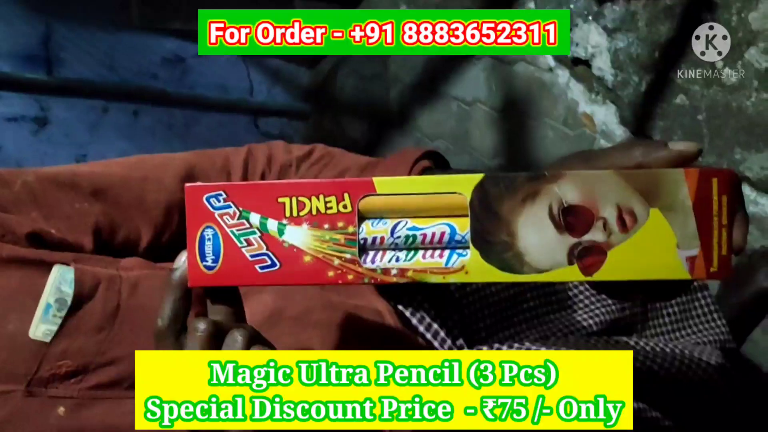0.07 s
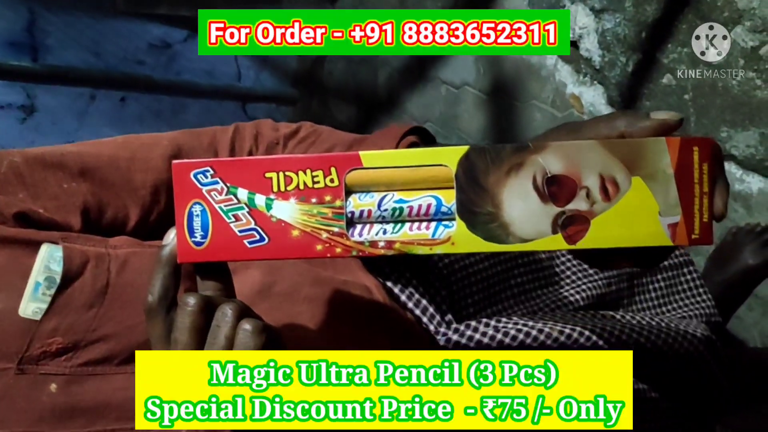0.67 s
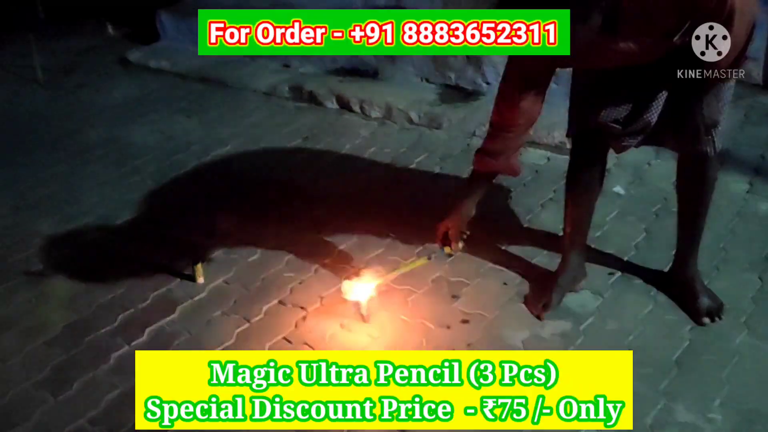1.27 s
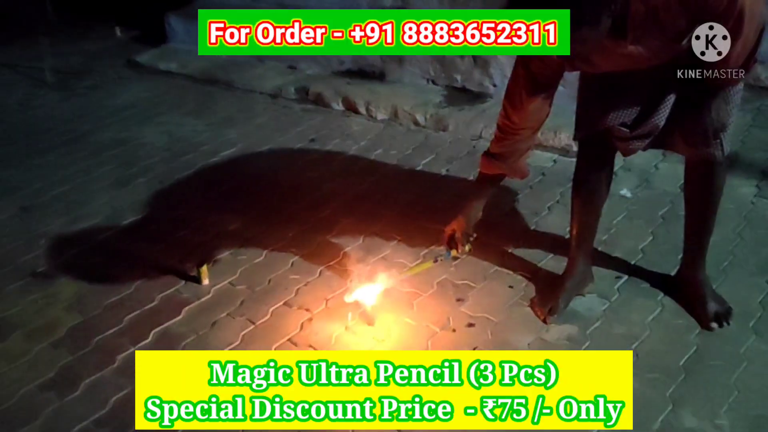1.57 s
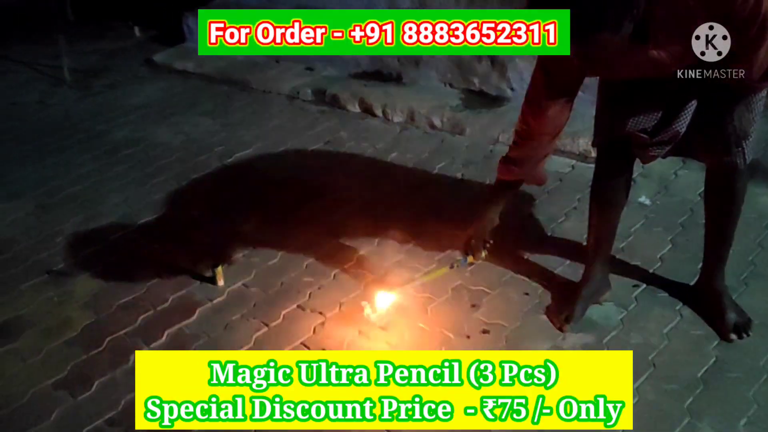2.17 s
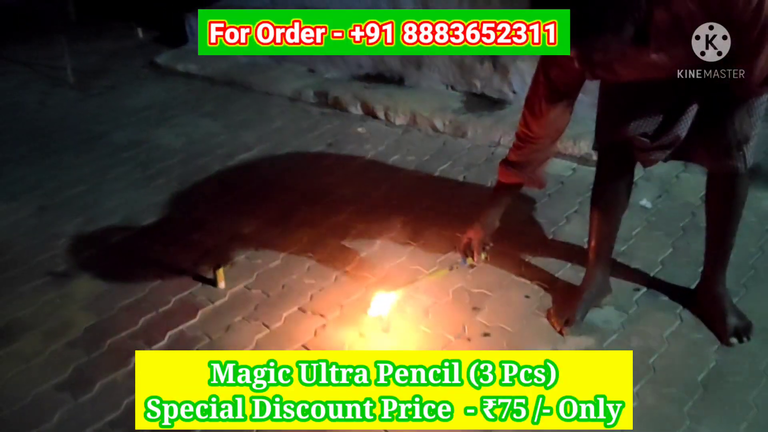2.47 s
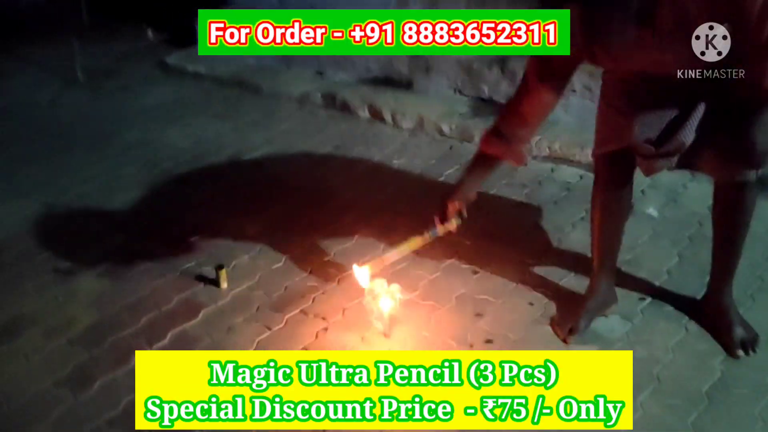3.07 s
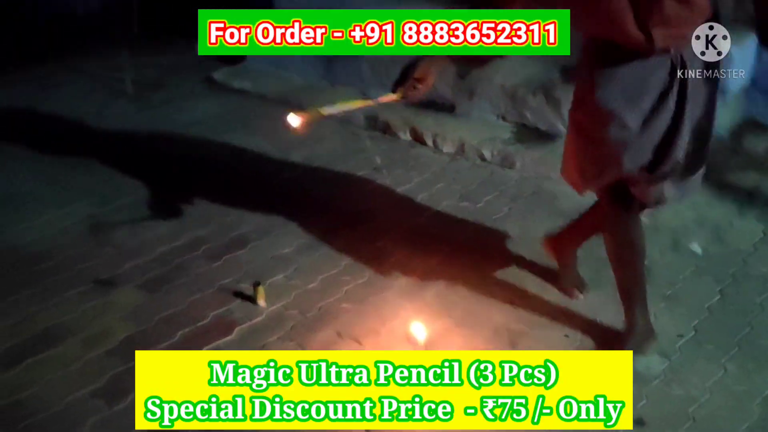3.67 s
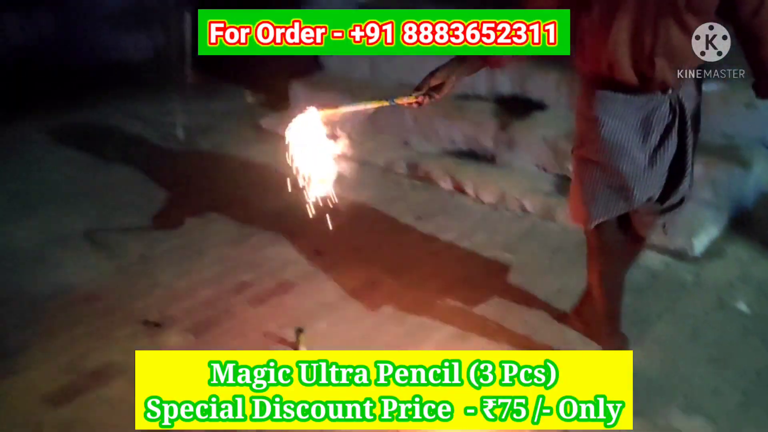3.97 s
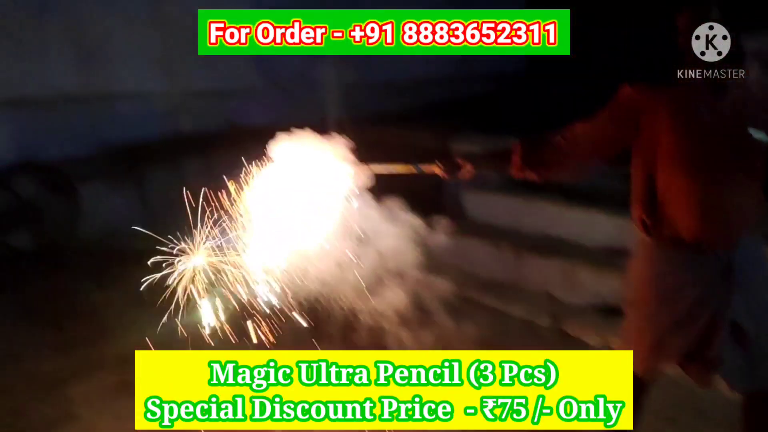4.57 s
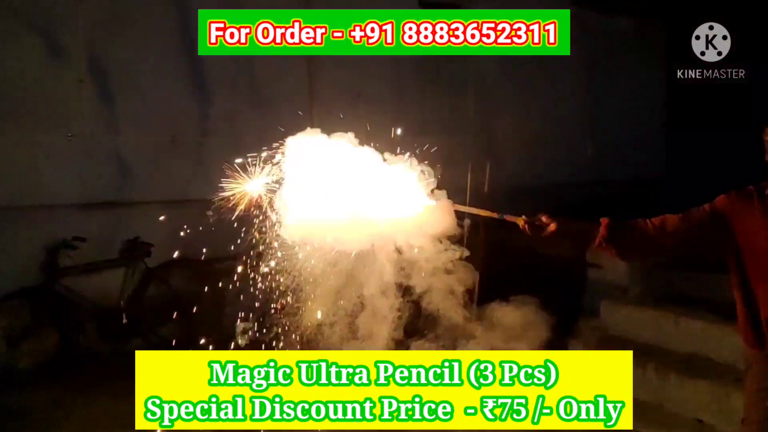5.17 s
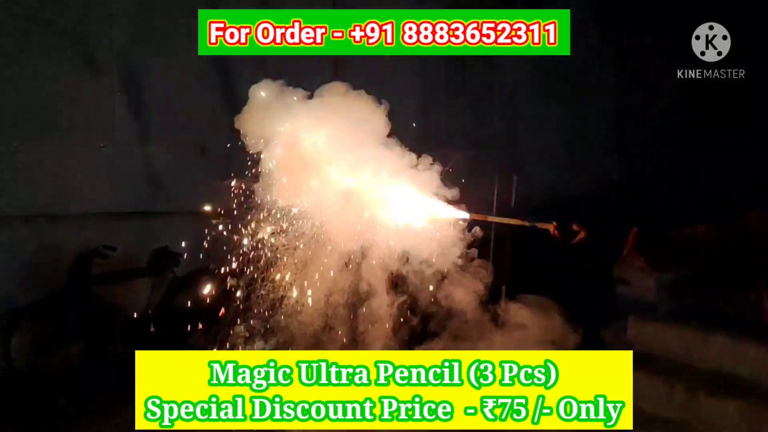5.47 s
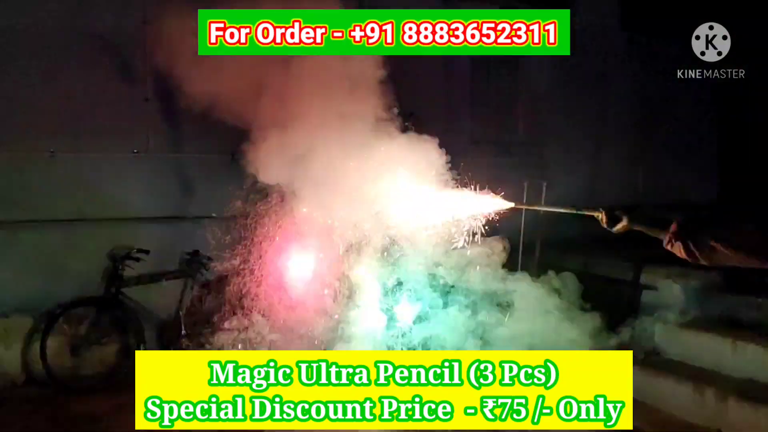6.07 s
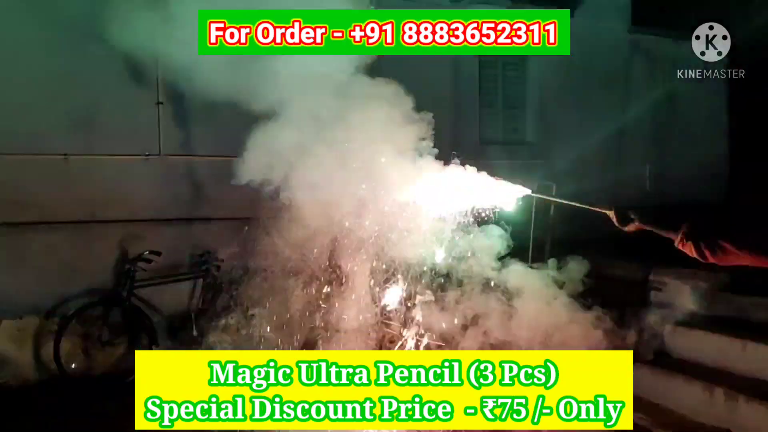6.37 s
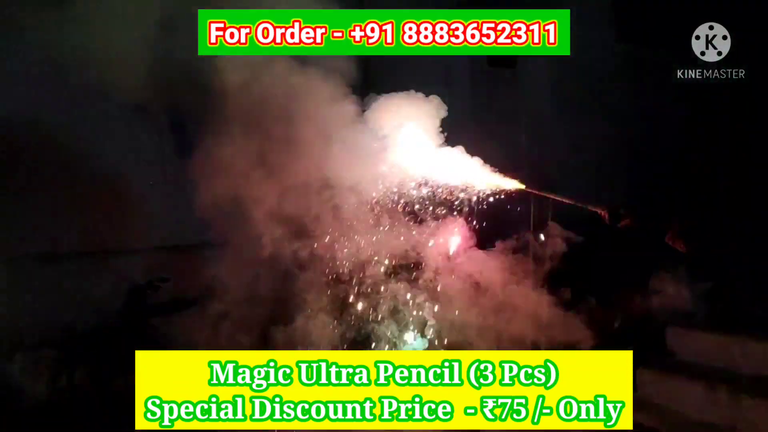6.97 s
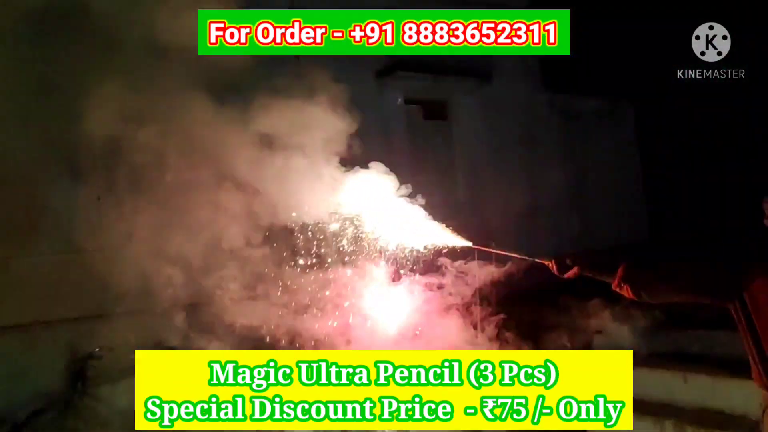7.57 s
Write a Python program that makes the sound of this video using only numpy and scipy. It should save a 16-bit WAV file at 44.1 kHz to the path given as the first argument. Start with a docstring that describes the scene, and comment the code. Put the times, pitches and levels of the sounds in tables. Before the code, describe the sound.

In a paved yard at night, crickets trill and bush crickets give high, rasping chirps over a faint rumble. The tip of a handheld firework sputters softly in a flame, and fingers tap and rub near the microphone. About halfway a jet of gas starts hissing, then loud, uneven cracks and dull thumps follow, each trailing sizzling sparks. The blasts echo briefly off walls and overload the microphone.

```python
"""A handheld pencil firework shoots stars that burst in uneven cracks and thumps, in a paved yard at night.
Each burst leaves a sizzle of sparks between the walls. Before that, the tip sputters in a flame, fingers
shift on the phone, and a jet of gas starts to hiss. The blasts overload the microphone; each channel's
signal lurches, swings slowly back and chokes the hiss. Behind it all, crickets and bush crickets call."""
import sys
import numpy as np
from scipy import signal
from scipy.fft import rfft, irfft, next_fast_len
from scipy.io import wavfile

SR = 44100
rng = np.random.default_rng(int(sys.argv[2]) if len(sys.argv) > 2 else 0)


def digitize_waveform(pressure):
    """Quantize a signal to 16-bit integers and store it at the path in sys.argv[1].

    Rows of a 2-D input are taken as channels; values are limited to [-1, 1].
    """
    field = np.atleast_2d(pressure).T
    bounded = np.clip(field, -1, 1)
    quanta = np.round(bounded * 32767).astype(np.int16)
    wavfile.write(sys.argv[1], SR, quanta)


N = 344421
T = np.arange(N) / SR


# How strong a crack is from low to high pitch: f/Hz, level/dB
CRACK_TONE = [(100, -49), (500, -8.5), (1000, -3.5), (1600, -7), (2500, 5), (3600, 0), (5500, 2),
              (7800, 7.5), (11000, 2), (14000, -3.5)]
# Bursting stars; each layer adds its own gain: t/s, crack level/dB, thump level/dB, sizzle level/dB
BURSTS = [(4.6916, -12.5, -70, -24.5), (4.7852, -20.5, -75, -50), (4.873, -12.5, -20.5, -21),
          (4.886, -10.5, -23, -22), (5.0562, -11, -21.5, -24.5), (5.1755, -21, -39, -51),
          (5.2172, -23, -55, -32.5), (5.2361, -9.5, -14.5, -18), (5.2453, -8, -21, -18),
          (5.279, -12, -27, -41), (5.3557, -13.5, -26, -43), (5.4718, -12.5, -11.5, -23.5),
          (5.5234, -15, -20.5, -32), (5.7526, -13, -20.5, -22.5), (5.771, -22.5, -25.5, -34),
          (5.8548, -12.5, -27, -26), (5.919, -11, -32.5, -26), (5.9697, -15, -30.5, -25),
          (6.153, -11.5, -19, -16), (6.1725, -16.5, -23.5, -29), (6.1933, -14.5, -27, -43),
          (6.225, -9, -23, -20), (6.4725, -18, -36, -37), (6.499, -14.5, -21.5, -24),
          (6.56, -18.5, -30.5, -49), (6.696, -25.5, -46, -36), (6.876, -19, -31, -29.5),
          (7.0063, -16, -29.5, -25.5), (7.0389, -6.5, -14.5, -18), (7.1998, -17, -36.5, -48),
          (7.226, -14, -32.5, -23.5), (7.235, -16, -22, -20.5), (7.44, -12.5, -25.5, -20),
          (7.4692, -14, -32.5, -25), (7.4999, -11, -21, -20.5), (7.51, -8, -17.5, -19.5),
          (7.7773, -21, -33, -27)]
def cracks(snap_s=0.0017, paving_db=-2, repeat_db=-9.5, wall_db=-12, gain_db=7, tint_db=2.0):
    """A star snaps, each with its own tone; the paving and then the walls throw the snap back."""
    out, t = np.zeros((2, N)), T[:SR // 16]
    noise = stereo_noise(CRACK_TONE, shared_hz=1520)
    tint_hz = np.geomspace(400, 12000, 8)
    for (s, db, _, _), chance in zip(BURSTS, rng.random((len(BURSTS), 13))):
        snap = (undb(db + gain_db) * np.exp(-t / snap_s)) ** 2
        power = np.zeros(2 * len(t))
        add(power, 0, snap)
        add(power, .0018 + 0.0024 * chance[0], snap * undb(paving_db) ** 2)
        # every crack repeats, weaker, about 18 ms later
        add(power, 0.018 + 0.004 * (chance[1] - .5), snap * undb(repeat_db) ** 2)
        for wall in chance[2:5]:
            add(power, 0.0044 + 0.028 * wall, snap * undb(wall_db) ** 2)
        tint = np.column_stack([tint_hz, tint_db * (2 * chance[5:] - 1)])
        grain = noise[:, int(s * SR) - len(power):int(s * SR)]
        add(out, s, np.sqrt(power) * shape_tone(grain, tint))
    return out


# The dull tone of a thump: f/Hz, level/dB
THUMP_TONE = [(50, -28), (180, 7), (320, -1), (550, 2), (850, -2.5), (1400, -5.5), (2200, -8.5),
              (5000, -22)]
def thumps(gain_db=35, echo_db=-4, spread_s=0.00597):
    """A star's puff of gas gives the air a blunt push, which bounces off paving and body."""
    pulses = np.zeros((2, N))
    for (s, _, db, _), chance in zip(BURSTS, rng.random((len(BURSTS), 8))):
        pulses[:, int((s + .0005) * SR)] += undb(db + gain_db)
        for side, echoes in zip(pulses, chance.reshape(2, -1)):
            at = ((s + 0.001003 + spread_s * echoes) * SR).astype(int)
            side[at] += undb(db + gain_db + echo_db) * (-1) ** np.arange(len(at))
    return shape_tone(pulses, THUMP_TONE)


# The bright tone of the sparks: f/Hz, level/dB
SIZZLE_TONE = [(100, -4), (500, -14), (900, -10), (1500, -10), (2400, 0), (3500, -3.5), (5000, -1.5),
               (7500, 0.5), (10000, -0.5), (14000, -13.5)]
def sizzle(fast_s=0.035, slow_s=0.07, slow_share=0.35, gain_db=1, ticks_per_s=70, tick_db=-12):
    """After each burst, tiny sparks crackle out in spurts and melt into the echo of the yard."""
    fast, slow, t = np.zeros(N), np.zeros(N), T[:SR]
    for s, _, _, db in BURSTS:
        rise = undb(db + gain_db) ** 2 * (1 - np.exp(-t / 0.002))
        add(fast, s, rise * np.exp(-t / fast_s))
        add(slow, s, rise * np.exp(-t / slow_s))
    sparks = unit(undb(-wander(1000) - 0.5 * wander(190) + 0.7 * wander(40)))
    # now and then a larger spark ticks on its own
    big_sparks = (rng.random(N) < ticks_per_s / SR) * rng.random(N)
    tick_fade = np.exp(-1 / (0.00019 * SR))
    ticks = undb(tick_db) * unit(signal.lfilter([1], [1, -tick_fade], big_sparks))
    early = (1 - slow_share) * fast * sparks ** 2
    late = slow * (slow_share * sparks + ticks ** 2)  # echoes overlap, so this is less grainy
    return np.sqrt(early + late) * stereo_noise(SIZZLE_TONE, shared_hz=300)


# The tone of the hissing gas: f/Hz, level/dB
JET_TONE = [(150, -7.5), (330, -6.5), (1400, -14.5), (2500, -2), (4000, -9.5), (6000, -4.5), (8300, 4),
            (11000, -2.5), (14000, -5)]
def gas_jet(full_burn_s=4.347, catch_db_per_s=33, fade_db_per_s=0.7, hiss_db=-37.5, flame_db=-54.5):
    """Gas hisses from the tube over the soft rush of the flame; it catches fast, then slowly weakens."""
    grains = unit(undb(.5 * wander(45) + 2.0 * wander(1700)))
    hiss = undb(hiss_db) * grains * stereo_noise(JET_TONE, shared_hz=1800)
    rush = stereo_noise([(120, -10), (200, -7), (310, 2.5), (450, -12), (700, 0.5), (1050, -7.5),
                         (1500, -6.5), (4000, -20.5)], shared_hz=3000)
    age = T - full_burn_s
    surges_db = 2.5 * wander(5)
    burn = undb(np.minimum(catch_db_per_s * age, -fade_db_per_s * age) + surges_db)
    flare = swell(peak_s=4.24, db=-57, half_s=0.055)  # the flame flares as it catches
    return burn * (hiss + undb(flame_db) * rush) + flare * rush


# How the microphone's two ports (sound holes) differ: f/Hz, left minus right level/dB
PORT_BALANCE = [(300, 2.5), (2400, 0), (4400, -0.5), (7800, -7), (9500, -2.5), (12000, 11), (14500, 9.5)]
def port_tone(sound):
    """Each microphone port changes the tone of the firework in its own way, mostly the highs."""
    return np.array([shape_tone(side, [(hz, sign * db / 2) for hz, db in PORT_BALANCE])
                     for side, sign in zip(sound, (1, -1))])


def overload_swing(swing_hz=4.2, rise_s=0.0013, settle_s=0.184, right_share=0.55):
    """A blast overloads the microphone's amplifier; each channel's signal lurches and swings back."""
    out, t = np.zeros((2, N)), T[:SR]
    fade = (1 - np.exp(-t / rise_s)) * np.exp(-t / settle_s)
    for (s, _, thump_db, _), (force, pace) in zip(BURSTS, rng.uniform(-1.06, 1, (len(BURSTS), 2, 2, 1))):
        jolt = np.interp(thump_db, [-39, -21], [0, 0.87])  # weak thumps do nothing, big ones hit a limit
        direction = 1 if out[:, int(s * SR)].sum() < 0 else -1
        shares = np.array([[1], [right_share]]) + 0.7 * force
        swing = np.cos(2 * np.pi * swing_hz * (1 + 0.31 * pace) * t)
        add(out, s, direction * jolt * shares * fade * swing)
    wobble = stereo_noise([(25, 3.0), (60, -11.5), (150, -26.5), (400, -59), (3000, -90)], shared_hz=14)
    return out * (1 + 0.12 * wobble)


# Soft puffs from the tip, and a brief swish near 2.8 s: loudest t/s, level/dB, half length/s
TIP_PUFFS = [(1.28, -52, 0.034), (2.455, -51.5, 0.045), (2.8, -51.5, 0.013), (2.998, -53, 0.16)]
# Sharper spits, and a tick near 2.8 s: t/s, level/dB, fade time/s
TIP_SPITS = [(1.282, -41.5, .009), (1.312, -39.5, 0.0095), (2.814, -47, .005)]
def sputter(grain_db=3.5):
    """Held in the flame, the tip gives short gritty hisses and spits before the powder catches; near 2.8 s a
    brief swish and tick join in."""
    level, t = sum(swell(*puff) for puff in TIP_PUFFS), T[:SR // 8]
    for s, db, fade_s in TIP_SPITS:
        add(level, s, undb(db) * np.exp(-t / fade_s))
    hiss = stereo_noise([(300, -7), (900, 2.5), (1800, 2), (3000, -0.5), (5000, 1.0), (9000, 0),
                         (14000, -2)], shared_hz=1500)
    return level * unit(undb(grain_db * wander(1200))) * hiss


# Finger taps: t/s, level/dB
FINGER_TAPS = [(3.264, -49), (3.313, -41.5), (3.357, -37), (3.366, -40), (3.393, -39), (3.412, -42.5),
               (3.428, -44), (3.469, -42), (3.498, -50)]
# Skin sliding on the case: loudest t/s, level/dB, half length/s
FINGER_RUBS = [(3.303, -62, 0.22), (3.528, -48.5, 0.024), (3.631, -47.5, 0.048)]
# The tone of the phone case: f/Hz, level/dB
CASE_TONE = [(40, 5), (130, 6), (300, -5), (700, -4.5), (1300, -0.5), (2000, -3.5), (4000, -13),
             (7000, -16), (14000, -23)]
def fingers(tap_fade_s=0.0051, grit_db=2.5):
    """Fingers tap and drag on the phone case, mostly beside the left port."""
    taps, t = np.zeros((2, N)), T[:SR // 8]
    for s, db in FINGER_TAPS:
        add(taps, s, undb(db) * pan(left_db=16.5) * np.exp(-t / tap_fade_s))
    grit = unit(undb(grit_db * wander(1100)))
    drag = sum(swell(*rub) for rub in FINGER_RUBS) * pan(left_db=12) * grit
    return (taps + drag) * stereo_noise(CASE_TONE, shared_hz=300)


# Bush cricket chirps: loudest t/s, level/dB, left minus right level/dB
BUSH_CHIRPS = [(0.273, -38.5, -3), (0.723, -42, -2), (1.296, -48.5, -2), (1.406, -43.5, -1),
               (1.96, -33.5, -1), (2.426, -42, -5), (2.979, -32.5, 4), (3.523, -54, 1), (4.097, -31.5, -1)]
# The three beats of a chirp: t/s from the loudest, level/dB next to the loudest
CHIRP_BEATS = [(-0.11, -26), (0, 0), (0.113, -15)]
def bush_crickets(half_s=0.03, teeth_per_s=800):
    """Tiny teeth scrape across a wing and make it ring in a high, swelling rasp."""
    level = sum(pan(left_db) * swell(s + lag_s, db + beat_db, half_s)
                for s, db, left_db in BUSH_CHIRPS for lag_s, beat_db in CHIRP_BEATS)
    wing = stereo_noise([(5000, -60), (6700, -20.5), (7800, -5.0), (9200, -0.5), (10400, -3.5),
                         (11600, -10.5), (14000, -22)], shared_hz=3000)
    teeth = unit(undb(wander(teeth_per_s)))
    return yard_echo(level * wing * teeth)


def yard_echo(sound, ring_s=0.43, echo_db=-12.0):
    """Walls and paving add a blur of echoes that dies away by 60 dB in ring_s."""
    t = T[:SR]
    tail = rng.standard_normal((2, SR)) * undb(-60 * t / ring_s) * (t > .008)
    tail /= np.sqrt(np.sum(tail ** 2, axis=1, keepdims=True))
    return sound + undb(echo_db) * signal.fftconvolve(sound, tail, axes=1)[:, :N]


# The tone of the distant rumble: f/Hz, level/dB
RUMBLE_TONE = [(25, 0.5), (90, 1.5), (150, -12.5), (380, -8.5), (600, -13), (1100, -20), (1600, -22),
               (2200, -17.5), (3300, -31), (5000, -31.5), (8000, -18), (14000, -40)]
# Steady night callers: f/Hz, width/Hz, level/dB, start t/s, pulse rate/Hz, pulse depth (0 = no pulsing)
NIGHT_CALLERS = [(2627, 190, -63, 0.12, 150, 0), (2549, 51, -62.5, 1.38, 89, 0),
                 (7290, 760, -62.5, 0.1, 54, 0.14), (778, 162, -63, 1.335, 3.5, 0.1)]
def night(rumble_db=-57.5):
    """Far crickets and a soft drone each hold one pitch over a low, distant rumble."""
    out = undb(rumble_db + 0.24 * wander(7.0)) * stereo_noise(RUMBLE_TONE, shared_hz=1100)
    for hz, width_hz, db, start_s, rate, depth in NIGHT_CALLERS:
        band = [(hz * np.exp(k * width_hz / hz), -40 * np.log10(1 + k * k))
                for k in np.linspace(-8, 8, 33)]
        pulsing = 1 + depth * np.cos(2 * np.pi * rate * T + 0.56 * wander(4.2))
        call = unit(stereo_noise(band, shared_hz=hz) * pulsing)
        out += undb(db) * call * np.clip((T - start_s) / 0.081, 0, 1)
    return out


def undb(db):
    """Turn decibels into a number to multiply by."""
    return 10 ** (np.asarray(db) / 20)


def unit(x):
    """Scale to an average strength (rms) of 1."""
    return x / np.sqrt(np.mean(x ** 2))


def shape_tone(x, points):
    """Turn pitches up or down along a line of (f/Hz, level/dB) points."""
    hz, db = np.transpose(points)
    size = next_fast_len(x.shape[-1], True)
    f = np.maximum(np.arange(size // 2 + 1) * SR / size, 1)
    gain = undb(np.interp(np.log(f), np.log(hz), db))
    return irfft(rfft(x, size) * gain, size)[..., :x.shape[-1]]


def stereo_noise(points, shared_hz):
    """Noise with a tone of (f/Hz, level/dB) points, alike in both ears below shared_hz."""
    mid, side = rng.standard_normal((2, N))
    side = signal.sosfilt(signal.butter(1, shared_hz, "high", fs=SR, output="sos"), side)
    return unit(shape_tone(np.array([mid + side, mid - side]), points))


def wander(per_s):
    """Glide between random values, per_s of them each second."""
    return np.interp(T * per_s, np.arange(N // 8), rng.standard_normal(N // 8))


def swell(peak_s, db, half_s):
    """A level that rises smoothly to its peak and falls again."""
    return undb(db) * np.exp(-((T - peak_s) / half_s) ** 2 / 2)


def pan(left_db):
    """Left and right gains that make the left side louder by left_db."""
    return undb(np.array([[.5], [-.5]]) * left_db)


def add(track, start_s, piece):
    """Mix a piece into a track."""
    i = int(start_s * SR)
    piece = piece[..., :max(N - i, 0)]
    track[..., i:i + piece.shape[-1]] += piece


def scene():
    """The firework in its yard; the quieter sounds fade in at the start."""
    firework = port_tone(cracks() + thumps() + sizzle() + gas_jet()) + overload_swing()
    fade_in = undb(np.interp(T, [0, .16, .21], [-47, -25, 0]))
    return firework + fade_in * (night() + bush_crickets() + sputter() + fingers())


def record(dry, limit=.82, hardness=4.9, top_hz=14400):
    """The signal hits its limit, so a big swing chokes the hiss on it; then the highest tones are cut."""
    squashed = dry / (1 + np.abs(dry / limit) ** hardness) ** (1 / hardness)
    return signal.sosfiltfilt(signal.ellip(8, .1, 50, top_hz, fs=SR, output="sos"), squashed)


dry = scene()
out = record(dry)
digitize_waveform(out)
```